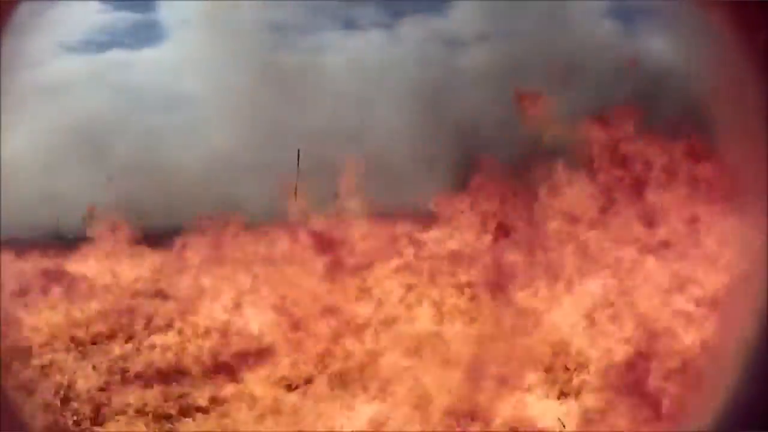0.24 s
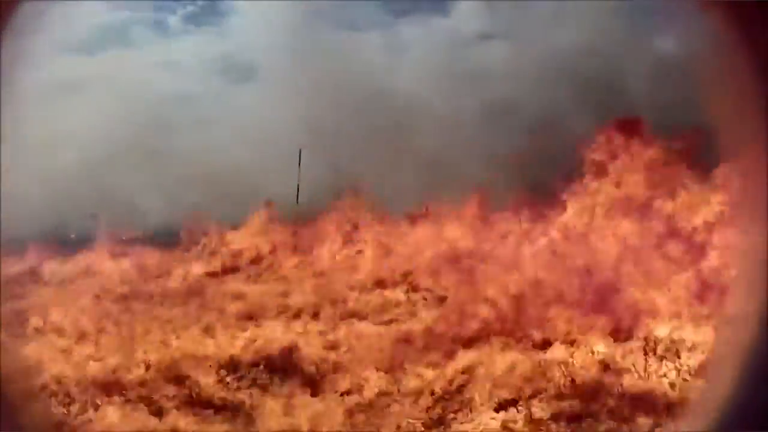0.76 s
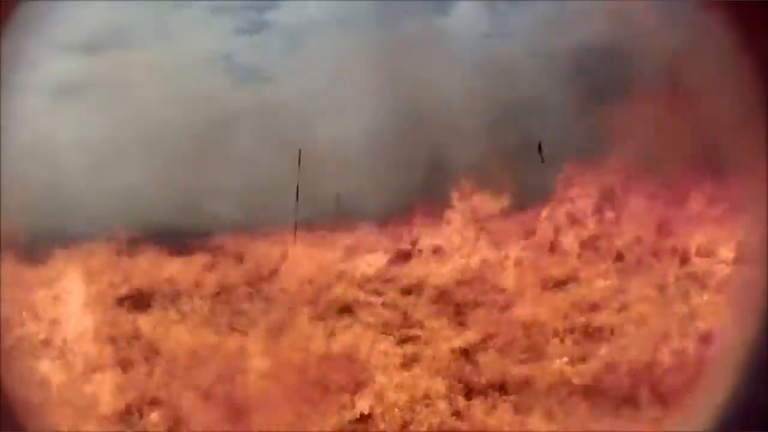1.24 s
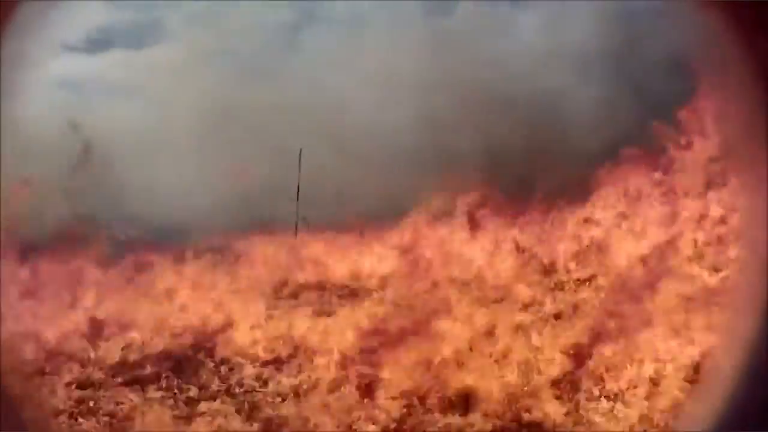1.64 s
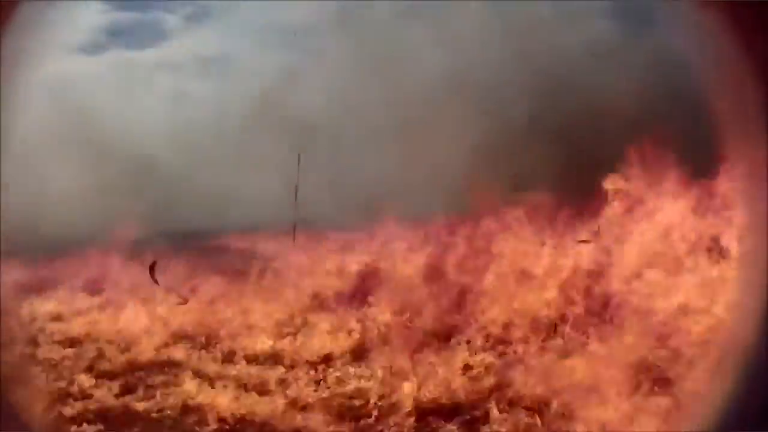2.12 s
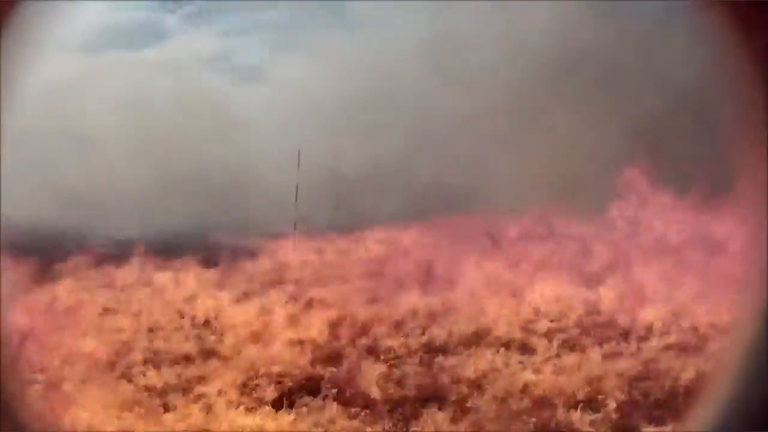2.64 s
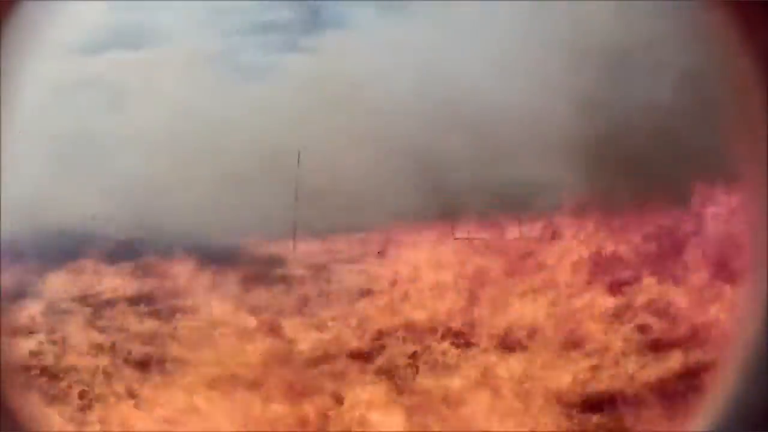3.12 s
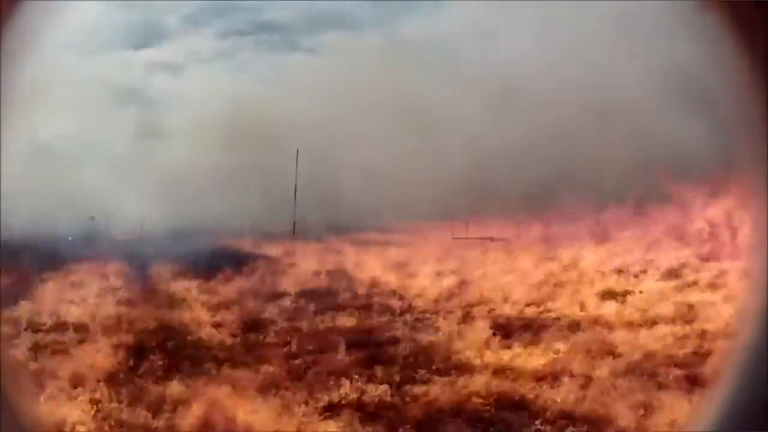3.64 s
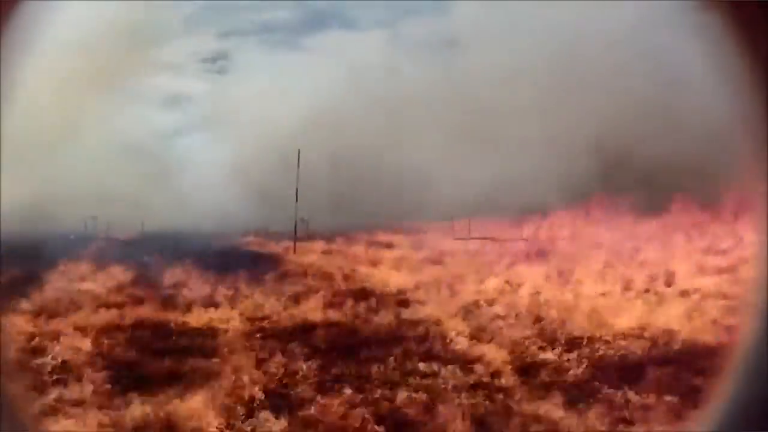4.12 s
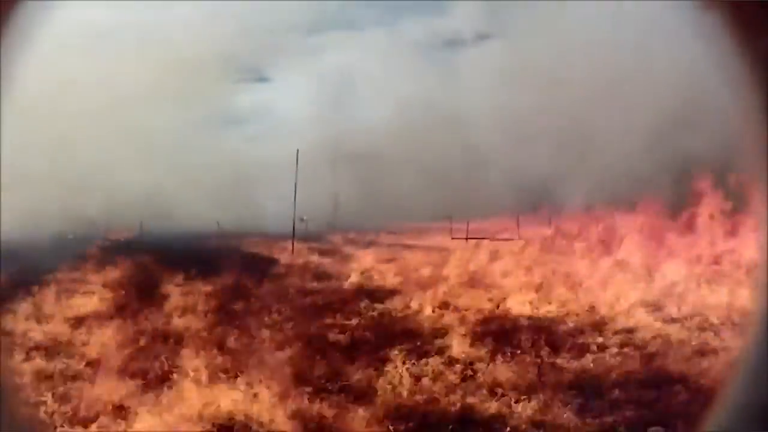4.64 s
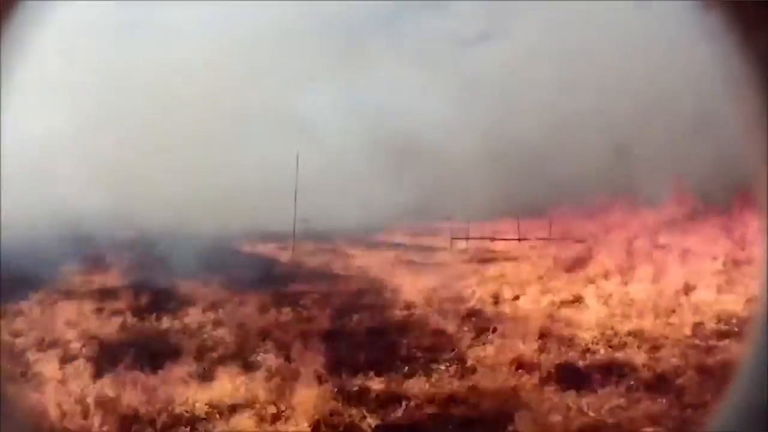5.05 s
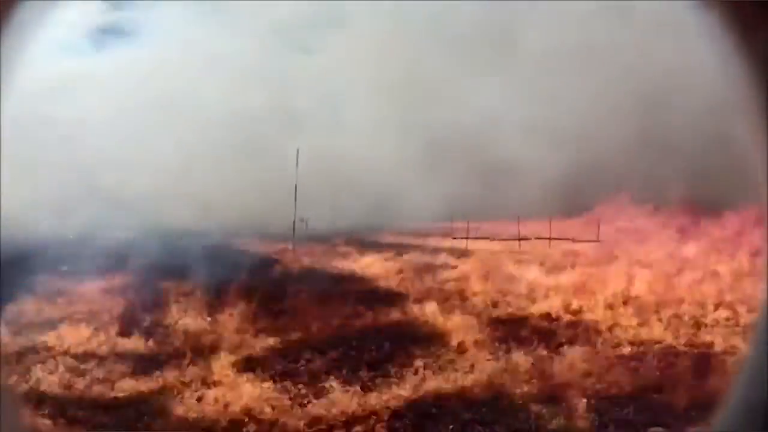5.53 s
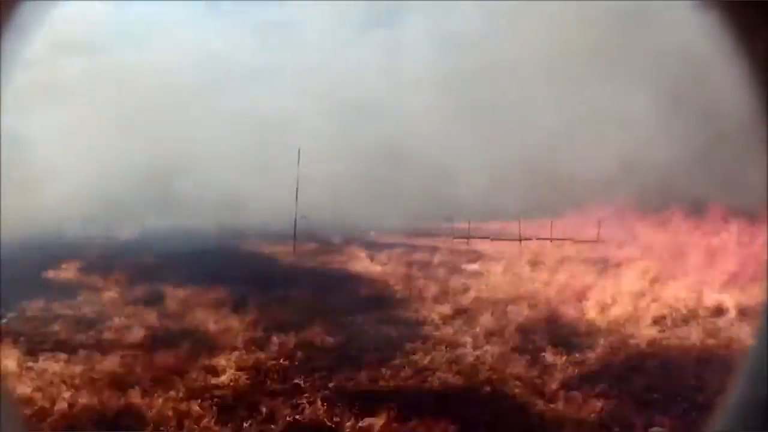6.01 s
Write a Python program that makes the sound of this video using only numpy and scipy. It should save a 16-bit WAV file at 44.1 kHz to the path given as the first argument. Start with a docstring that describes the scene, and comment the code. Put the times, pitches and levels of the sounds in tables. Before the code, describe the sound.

Dry stubble burns close by with dense sizzle and sharp snaps, over rushing flames and gusty low wind rumble, gradually dulling as the fire passes.

```python
"""The sizzle of dry stubble on fire: countless tiny random bursts that blur and dull as the front moves off.
A few close stalks snap: one crack each, a quick run of fibres and a faint tail, over crackle and rushing flames.
Filtered noise makes the roar, the far fire and one whoosh; wind noise and single pushes rumble on the housing.
The fire's sizzle, snaps and rush, near and far, pass through the hollow resonances of the microphone housing."""
import sys
import numpy as np
from scipy import signal
from scipy.fft import rfft, irfft
from scipy.io import wavfile
from scipy.ndimage import uniform_filter1d, minimum_filter1d

SR = 44100
rng = np.random.default_rng(int(sys.argv[2]) if len(sys.argv) > 2 else 0)


def wrap_up_sound(samples):
    """Save the sound to the file named by the first command line argument, as 16-bit audio."""
    columns = np.atleast_2d(samples).T
    # keep every value between -1 and 1, then stretch to whole-number steps
    tamed = np.clip(columns, -1, 1)
    steps = np.round(tamed * 32767).astype(np.int16)
    wavfile.write(sys.argv[1], SR, steps)


N = 276502  # length in samples


def undb(db):
    """Turn decibels into a gain."""
    return 10 ** (np.asarray(db) / 20)


def unit(x):
    """Scale to an average strength (rms) of 1."""
    return x / np.sqrt(np.mean(x ** 2))


def curves(table):
    """Join the rows of a table by straight lines in time, one curve per column after t."""
    s, *columns = np.transpose(table)
    t = np.arange(N) / SR
    return [np.interp(t, s, column) for column in columns]


def walk(rate):
    """Slow random wandering: levels held for 1 / rate seconds, then smoothed twice."""
    k = int(SR / rate)
    levels = rng.standard_normal(N // k + 2)
    held = np.repeat(levels, k)[rng.integers(k):]
    smooth = uniform_filter1d(uniform_filter1d(held, k), k)
    return unit(smooth[:N])


def colour(x, spectrum, resonances=()):
    """Filter a sound to a broad spectrum, with bell-shaped peaks and dips on top."""
    size = 2 ** 14
    f = np.arange(size // 2 + 1) * SR / size
    hz, db = np.transpose(spectrum)
    gain_db = np.interp(np.log(f + 1), np.log(hz), db)
    for centre, width, peak_db in resonances:
        gain_db = gain_db + peak_db / (1 + (2 * (f - centre) / width) ** 2)
    # folding the cepstrum makes the ringing follow the blow instead of preceding it
    cepstrum = irfft(np.log(undb(gain_db)))
    cepstrum[1:size // 2] *= 2
    cepstrum[size // 2 + 1:] = 0
    response = irfft(np.exp(rfft(cepstrum)))
    return signal.oaconvolve(x, response)[:N]


# resonances and notches of the housing, added together: f/Hz, width/Hz, level/dB
HOUSING_RESONANCES = [(860, 220, -6), (1012.6, 154, 14), (1224, 256, 12), (1540, 290, -3.5),
                      (1844, 260, 4.5), (2493, 58, 5), (3433, 240, 5), (3820, 134, 6), (4180, 230, 1),
                      (4490, 140, 6), (4910, 300, -6.5), (5270, 220, 5.5), (6360, 250, 1), (6230, 330, 4),
                      (7160, 110, 6.5), (8040, 230, -9), (8240, 360, 6)]


def in_housing(x, spectrum):
    """Colour a sound, then let the hollow housing strengthen some pitches and weaken others."""
    return colour(x, spectrum, HOUSING_RESONANCES)


def ring(x, hz, q):
    """One resonance with gain 1 at its centre; a higher q is narrower and rings longer."""
    return signal.lfilter(*signal.iirpeak(hz, q, fs=SR), x)


def smear(x, t60, direct_db):
    """Stems and ground scatter each tick into a tail that dies by 60 dB in t60 seconds."""
    t = np.arange(SR // 40) / SR
    tail = rng.standard_normal(len(t)) * undb(-60 * t / t60)
    tail /= np.sqrt(np.sum(tail ** 2))
    tail[0] += undb(direct_db)
    return signal.oaconvolve(x, tail)[:N]


def stalks(per_s, spread_db, q, count=24):
    """Tiny bursts at random moments, mostly weak, a few strong; each stalk size has its own pitch."""
    out = np.zeros(N)
    each = int(per_s * N / SR / count)  # bursts per stalk size
    for hz in np.geomspace(1200, 12000, count):
        moment, luck = rng.random((each, 2)).T
        strength = np.minimum(-np.log(1 - luck), 4.5)
        bursts = np.bincount((moment * N).astype(int), undb(spread_db * strength), N)
        out += smear(ring(bursts, hz, q), t60=0.025, direct_db=-7.0)
    return unit(out)


def turbulence(strength, spectrum, churn_db, evenness, trim_db):
    """Coloured noise with its swells partly evened out, then churned at random and set in strength."""
    eddies = unit(colour(rng.standard_normal(N), spectrum))
    swell = np.sqrt(uniform_filter1d(eddies ** 2, SR // 16))
    churned = eddies / swell ** evenness * undb(churn_db * walk(60))
    return unit(churned) * strength * undb(trim_db)


# broad spectrum of the distant fire: f/Hz, relative level/dB
FAR_FIRE_SPECTRUM = [(100, -4), (400, 3.5), (650, 3.5), (900, -10.5), (2000, -12), (4000, -16),
                     (12000, -25)]


def far_fire():
    """The rest of the burning field, a fluttering wash that grows as the fire spreads."""
    start_db, growth_db_per_s, flutter_db = -51.5, 0.52, -1.5
    wash = rng.standard_normal(N) * undb(flutter_db * walk(22.01))
    level_db = start_db + growth_db_per_s * np.arange(N) / SR
    return unit(in_housing(wash, FAR_FIRE_SPECTRUM)) * undb(level_db)


# soft spectrum of the puff: f/Hz, relative level/dB
WHOOSH_SPECTRUM = [(100, -22), (400, -2), (700, -3), (1600, -15), (3000, -21), (10000, -48)]


def whoosh():
    """A puff of hot air: low-middle noise that swells and fades once."""
    peak_s, length_s, level_db = 5.69, 0.07, -45  # length: from the peak down to 1/e
    swell = np.exp(-((np.arange(N) / SR - peak_s) / length_s) ** 2)
    puff = unit(colour(rng.standard_normal(N), WHOOSH_SPECTRUM))
    return puff * swell * undb(level_db)


# wind gusts, levels before the trims of rumble and roar:
# t/s at the peak, level/dB, length/s (shared between rise and fall), fanned roar level/dB re the gust
WIND_GUSTS = [(0.046, -18, 0.33, -14), (0.433, -18, 0.1, -18.5), (1.245, -11.5, 0.16, -25),
              (1.493, -22.5, 0.19, -13.5), (2.08, -19.5, 0.38, -21), (2.368, -8.5, 0.16, -19.5),
              (2.58, -22, 0.27, -19), (2.924, -16.5, 0.13, -18.5), (3.126, -10.5, 0.23, -20),
              (4.15, -21, 0.072, -21), (4.327, -16.5, 0.092, -27), (4.683, -19.5, 0.17, -31),
              (5.003, -18, 0.24, -24), (5.265, -15.5, 0.14, -22), (5.428, -21, 0.25, -25),
              (5.875, -19, 0.15, -33), (6.017, -16.5, 0.21, -20), (6.255, -17.5, 0.15, -23)]


def gusts():
    """Strength of the wind and of the roar it fans: each gust rises to a peak and falls away."""
    t, wind, roar_strength = np.arange(N) / SR, np.zeros(N), np.zeros(N)
    rise_share = 0.44
    for s, db, length, roar_db in WIND_GUSTS:
        width = length * np.where(t < s, rise_share, 1 - rise_share)
        gust = undb(db) * np.exp(-((t - s) / width) ** 2)
        wind = np.hypot(wind, gust)
        roar_strength = np.hypot(roar_strength, gust * undb(roar_db))
    return wind, roar_strength


# spectrum of wind on the housing: f/Hz, relative level/dB
RUMBLE_SPECTRUM = [(10, -29), (24, -7), (42, -3), (75, 1.5), (120, 1), (160, -6), (220, -17), (300, -36.5),
                   (500, -55.5), (2000, -85)]


def rumble(gust):
    """Eddies churn against the housing: a slowly easing wind with the gusts on top."""
    wind_db, easing_db_per_s = -23, 0.21  # before the trim
    steady = undb(wind_db - easing_db_per_s * np.arange(N) / SR)
    strength = np.hypot(steady, gust)
    return turbulence(strength, RUMBLE_SPECTRUM, churn_db=2.72, evenness=0.75, trim_db=0.5)


# single eddies striking the housing: t/s, peak level/dB before the trim, f/Hz, length/cycles
EDDY_STRIKES = [(0.432, -8, 114, 0.75), (0.51, -6, 90, 0.6), (1.253, -7, 100, 1.0), (1.45, -7, 99, 0.75),
                (1.717, -10, 86, 0.75), (2.303, -7, 85, 0.9), (2.434, -3, 91, 0.6), (3.155, -7, 75, 1.4),
                (3.406, 0, 125, 0.42), (3.431, -9, 86, 0.9), (3.891, -8, 95, 0.9), (3.983, -9, 88, 0.75),
                (4.131, -8, 75, 0.75), (4.17, -9, 83, 0.75), (4.332, -5, 78, 0.6), (4.399, -7, 101, 0.75),
                (4.588, -5, 80, 0.65), (4.735, -9, 85, 0.9), (4.921, -4, 82, 0.9), (4.987, -4, 109, 1.0),
                (5.064, -8, 67, 1.1), (5.272, -8, 108, 2.4), (5.407, -7, 106, 0.75), (5.892, -7, 95, 1.5),
                (6.005, -2, 105, 1.9)]


def buffets(steepness=1.8, trim_db=-1):
    """A lone eddy gives a soft push and pull of pressure: a short sine that swells and fades."""
    out, t = np.zeros(N + SR), np.arange(-SR // 10, SR // 10) / SR
    for s, db, hz, cycles in EDDY_STRIKES:
        envelope = 1 / np.cosh(steepness * t * hz / cycles) ** 1.32
        push = -np.sin(2 * np.pi * hz * t) * envelope
        start = int(s * SR) - SR // 10
        out[start:start + len(t)] += undb(db + trim_db) * push / np.abs(push).max()
    return out[:N]


# spectrum of the low roar: f/Hz, relative level/dB
ROAR_SPECTRUM = [(80, -28), (170, -1), (230, -0.5), (300, -6), (400, -13), (600, -23.5), (900, -28),
                 (2000, -69)]
# steady roar of the flames, lower once they have passed: t/s, level/dB before the trim
STEADY_ROAR = [(0, -36.5), (0.7, -38.5), (1.4, -36), (1.85, -39), (2.9, -36.5), (3.55, -42), (4.5, -42),
               (5.2, -41), (6.27, -41)]


def roar(fanned):
    """The low roar of the flames is churning noise, louder where gusts fan it."""
    steady = undb(curves(STEADY_ROAR)[0])
    strength = np.hypot(steady, fanned)
    return turbulence(strength, ROAR_SPECTRUM, churn_db=2.5, evenness=0.4, trim_db=1.5)


# spectrum of the rushing gas: f/Hz, relative level/dB
RUSH_SPECTRUM = [(200, -13.5), (500, -2.5), (800, -5), (1300, -4), (2000, -9.5), (4000, -12), (12000, -41)]


def flames(level_db, flutter_db=1.3):
    """The fluttering rush of burning gas, noise that rings the hollow housing."""
    gas = rng.standard_normal(N) * undb(flutter_db * walk(30))
    return unit(in_housing(gas, RUSH_SPECTRUM)) * undb(level_db)


# spectrum of a splitting stalk: f/Hz, level/dB
CRACK_SPECTRUM = [(300, -3), (1100, -12.5), (2300, -4.5), (5500, -7), (8500, -6), (11000, -15),
                  (15000, -15)]
# close stalks bursting, levels before the trim and the filtering:
# t/s, level/dB, f/Hz, sharp tick level/dB re level, hollow knock level/dB re level
CLOSE_SNAPS = [(0.122, -24.5, 3300, -5, -17), (0.137, -26, 3530, -6, -19), (0.249, -32.5, 3370, -6, -14),
               (0.37, -32.5, 3580, 2, -0.5), (1.134, -33, 3770, 6, 3), (1.155, -32, 2600, 0, -5),
               (1.435, -26.5, 2590, -1, -9), (1.637, -31.5, 3730, -8, -3.5), (1.836, -39, 3700, -16, 9),
               (1.865, -31.5, 3270, -4, -9), (2.058, -34, 3360, -10, -3), (2.118, -33.5, 3930, -2, -3),
               (2.512, -35.5, 2490, -4.5, 0), (2.807, -42, 3620, 1, 6), (3.413, -57, 4600, 7, -6),
               (3.727, -51, 3470, -8, 9), (3.768, -42, 3830, -5, -3), (4.239, -30, 3320, -3, -9),
               (4.490, -39, 3760, -18, -22), (4.518, -38.5, 3430, -6, -2), (4.581, -39.5, 3180, -9, -4),
               (5.154, -40, 3860, -12, -8), (5.472, -33.5, 3500, -10.5, -9), (5.577, -28.5, 3530, -10, -10),
               (6.025, -35, 3900, -16, -21)]


def snaps(q=1.78, trim_db=5.0):
    """A stalk splits with a sharp crack, then a quick run of fibres; the stubble scatters a faint tail."""
    first_db, scatter_db = 12, -23
    split_t60, scatter_t60 = 0.012, 0.21  # seconds to die by 60 dB
    out, t = np.zeros(N + SR), np.arange(SR // 10) / SR
    fade = undb(-60 * t / split_t60) + undb(scatter_db - 60 * t / scatter_t60)
    for s, db, hz, tick_db, knock_db in CLOSE_SNAPS:
        fibres = rng.standard_normal(len(t)) * fade
        fibres[0] = undb(first_db)
        start = int(s * SR)
        # the stalk's own pitch, the sharp tick and the hollow knock
        for centre, sharpness, part_db in [(hz, q, 0), (6200, 1.3, tick_db), (1150, 1.5, knock_db)]:
            part = ring(ring(fibres, centre, sharpness), centre, sharpness)
            part /= part[:SR // 170].std()  # the level is that of the first few milliseconds
            out[start:start + len(t)] += undb(db + part_db + trim_db) * part
    return in_housing(out[:N], CRACK_SPECTRUM)


def crackle(sizzle_db, trim_db=-13):
    """Now and then a nearer stalk pops out of the sizzle."""
    pops = stalks(per_s=40, spread_db=3.0, q=1.1, count=12)
    return unit(in_housing(pops, SIZZLE_SPECTRUM)) * undb(sizzle_db + trim_db)


# spectrum of the sizzle, also used by the crackle: f/Hz, relative level/dB
SIZZLE_SPECTRUM = [(300, -29), (900, -10), (1800, -6.5), (3600, 2.5), (5200, -4), (7200, -5.5), (8600, -10),
                   (10000, -17), (12000, -28.5), (15500, -57)]


def sizzle(level_db, blur_db=-4, blur_slope=0.22, flare_db=1.0):
    """Near stalks tick one by one; as the front recedes they blur into a hiss and lose their treble."""
    near_db = -31.5  # sizzle level with the flames beside the housing
    ticks = stalks(per_s=1400, spread_db=4.0, q=1.58)
    blur = undb(blur_db + blur_slope * (near_db - level_db))
    crowd = (ticks + blur * rng.standard_normal(N)) / np.hypot(1, blur)
    crowd *= undb(flare_db * walk(45))
    heard = unit(in_housing(crowd, SIZZLE_SPECTRUM))
    # the treble above about 6 kHz starts bright and dulls
    bright_db, dull_db, dulling_s = 4, -4, 1.66
    treble_db = dull_db + (bright_db - dull_db) * np.exp(-np.arange(N) / SR / dulling_s)
    body = signal.sosfiltfilt(signal.butter(2, 6000, fs=SR, output="sos"), heard)
    treble = heard - body
    return (body + treble * undb(treble_db)) * undb(level_db)


# how hard the near line of fire burns: t/s, sizzle level/dB (before the treble change), rush level/dB
NEAR_FIRE = [(0.0, -40, -35.8), (0.16, -31, -33), (0.5, -33.5, -41.5), (0.58, -32, -34), (0.88, -34.5, -38),
             (1.16, -35, -34.5), (1.26, -39, -45), (1.52, -36.5, -33), (1.78, -39, -40.5), (1.84, -36, -38),
             (2.0, -37, -40.5), (2.44, -43, -39.5), (2.85, -37.5, -36.5), (3.43, -55, -49),
             (3.53, -48, -50.5), (3.77, -45, -45), (3.95, -48.5, -48.5), (4.03, -43.1, -42),
             (4.29, -41, -42.5), (4.41, -45.5, -48), (4.65, -46.5, -42), (4.89, -42.2, -44),
             (4.99, -49, -45), (5.91, -42.5, -42), (6.11, -48.8, -46.5), (6.27, -47, -46)]


def scene():
    """Add up the near and far fire, the roar and the wind; the gusts both rumble and fan the roar."""
    sizzle_db, rush_db = curves(NEAR_FIRE)
    gust, fanned = gusts()
    background = far_fire() + whoosh() + rumble(gust) + buffets()
    burning = roar(fanned) + flames(rush_db)
    stubble = snaps() + crackle(sizzle_db) + sizzle(sizzle_db)
    return (background + burning + stubble)[None]


def record(dry):
    """Ease the gain down around the strongest peaks, add a faint hiss and cut the top."""
    ceiling, hiss_db, top_hz = 0.94, -66.5, 15700  # hiss level before the top is cut
    allowed = ceiling / np.maximum(np.abs(dry), ceiling)
    gain = uniform_filter1d(minimum_filter1d(allowed, SR // 60), SR // 60)
    wet = dry * gain + undb(hiss_db) * rng.standard_normal(dry.shape)
    return signal.sosfilt(signal.ellip(10, .2, 80, top_hz, fs=SR, output="sos"), wet)


dry = scene()
out = record(dry)
wrap_up_sound(out)
```